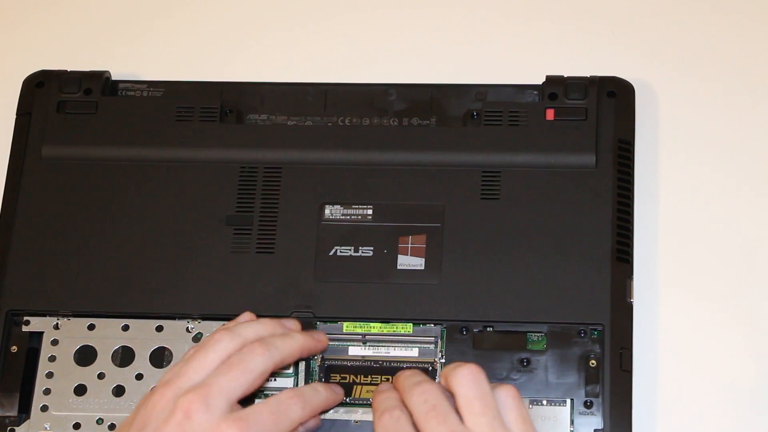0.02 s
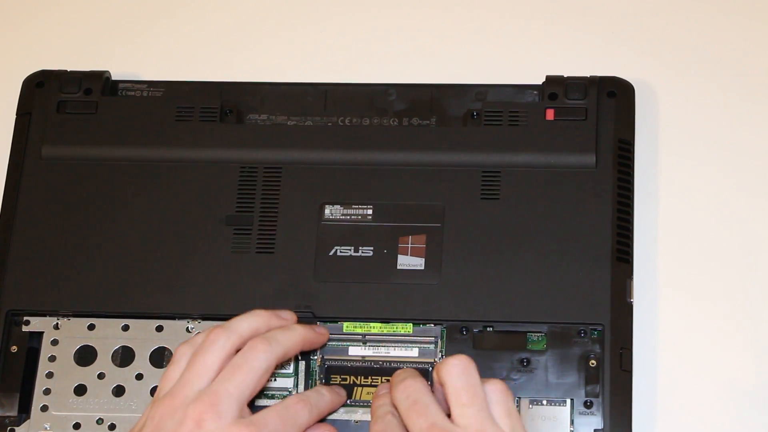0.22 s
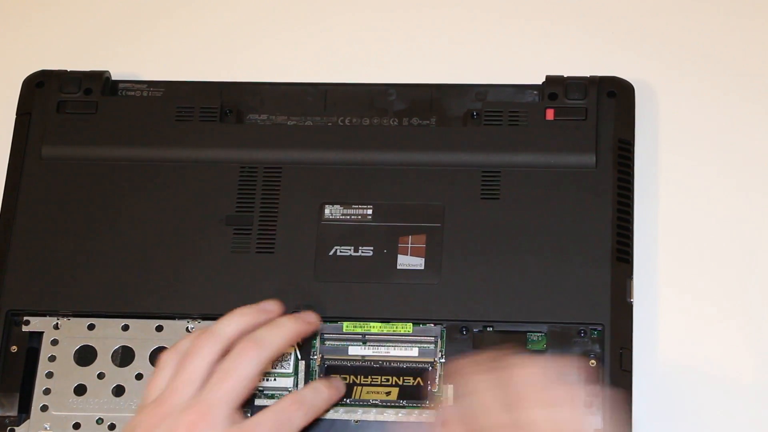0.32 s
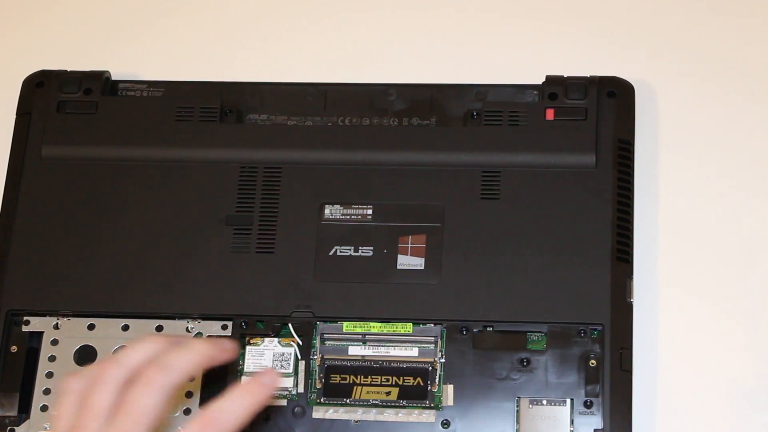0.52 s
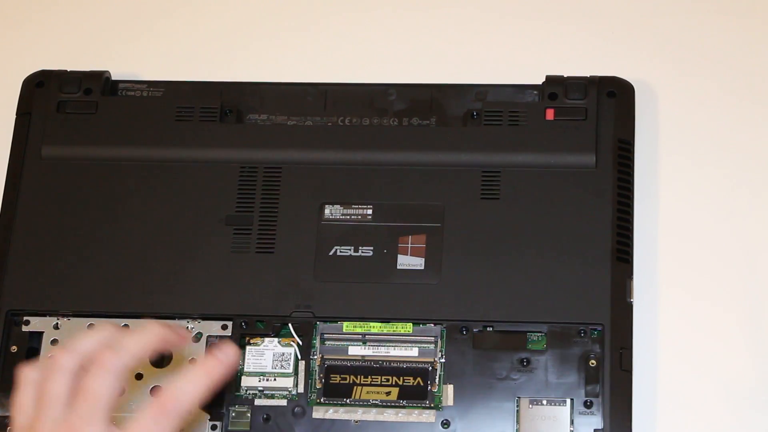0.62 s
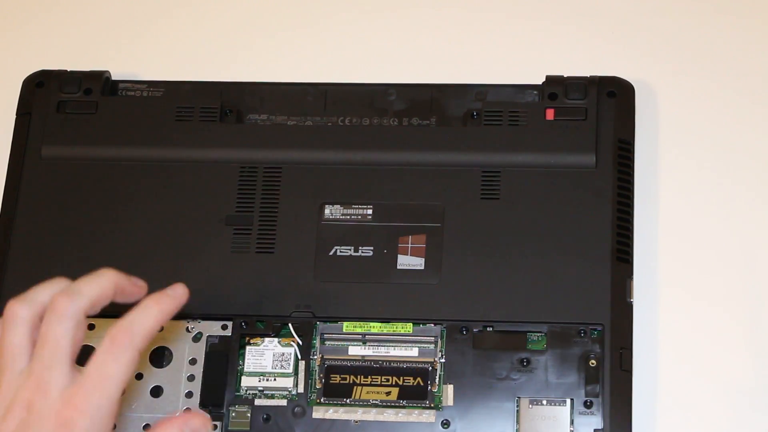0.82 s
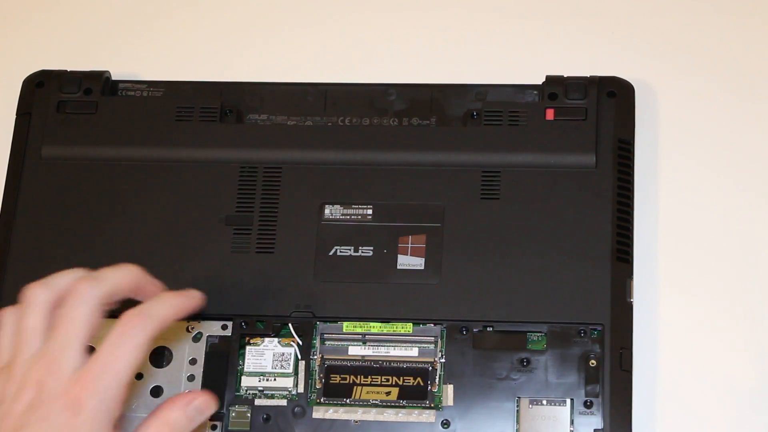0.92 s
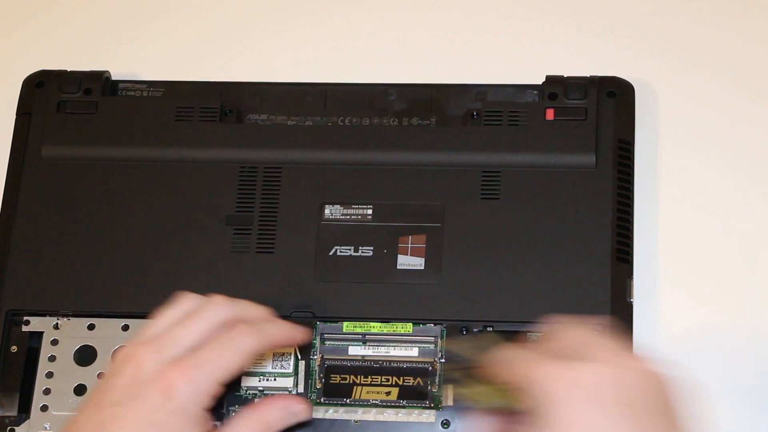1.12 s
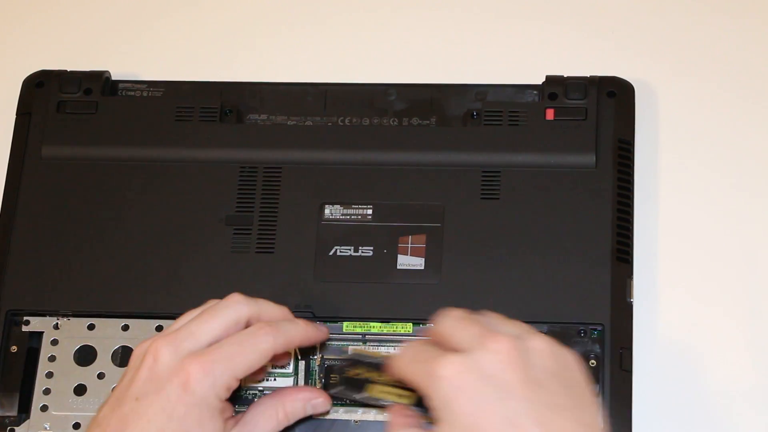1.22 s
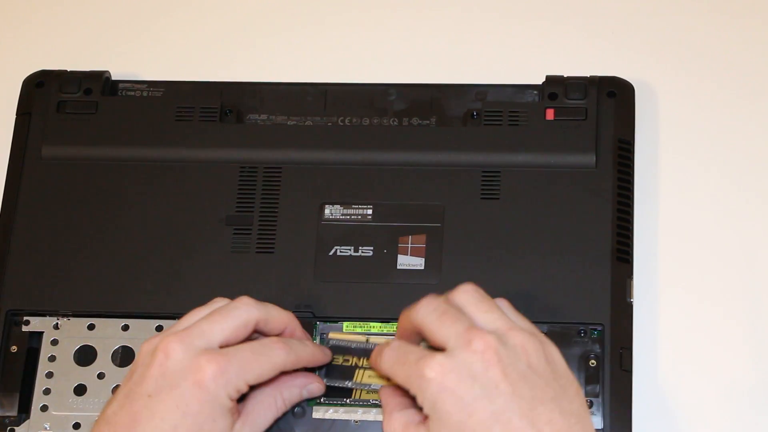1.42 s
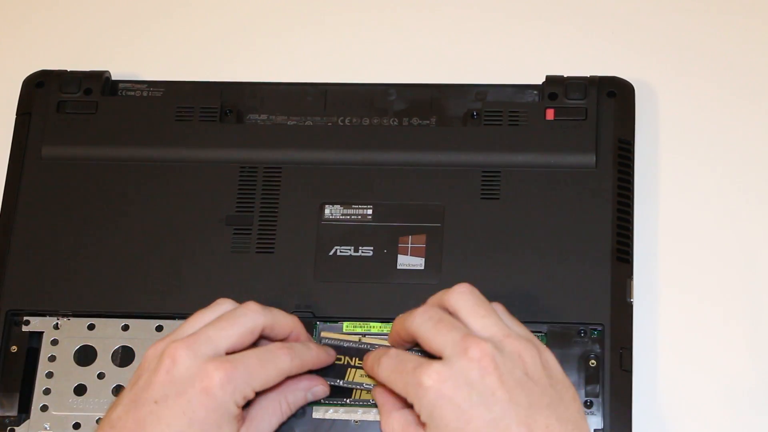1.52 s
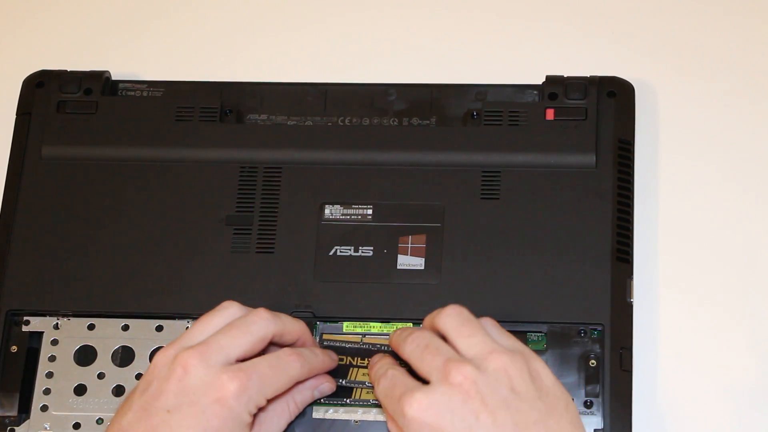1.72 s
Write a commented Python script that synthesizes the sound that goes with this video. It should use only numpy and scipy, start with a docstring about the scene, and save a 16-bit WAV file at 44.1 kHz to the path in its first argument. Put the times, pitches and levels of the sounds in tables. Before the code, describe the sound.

A sharp plastic latch snap as a circuit board clicks into its slot, then soft fumbling

```python
"""A latch springs home in one clipped burst of ticks as fingers press a small circuit board into its slot
in an upturned plastic case on a desk, close to a mono microphone. Sharp contacts ring damped modes of the case.
Fingers and board tap and rub as gritty pushes and friction grains, with a brief thin whistle of narrow noise.
Knocks make the desk boom softly, a small bare room answers with noise echoes, and hiss and rumble lie below."""
import sys
import numpy as np
from scipy import signal
from scipy.fft import rfft, irfft
from scipy.io import wavfile
from scipy.ndimage import uniform_filter1d

SR = 44100
rng = np.random.default_rng(int(sys.argv[2]) if len(sys.argv) > 2 else 0)


def invert_db(level):
    """Linear amplitude ratio for a level in decibels (20 dB per decade), elementwise."""
    return 10 ** (np.asarray(level, dtype=float) / 20)


def generate_wav(signal):
    """Clip the signal to [-1, 1] and save it as 16-bit WAV at the path in sys.argv[1]."""
    frames = np.transpose(np.atleast_2d(signal))
    scaled = np.clip(frames, -1, 1) * 32767
    pcm = np.round(scaled).astype(np.int16)
    wavfile.write(sys.argv[1], SR, pcm)


N = 79380
T = np.arange(N) / SR
BLOW_SAMPLES = 3000  # room for one contact and its ring


def ring(push, hz, t60_s, sharp=False):
    """One damped mode; a unit pulse rings it at height 1, starting from rest or, if sharp, from its crest."""
    radius = np.exp(-np.log(1000) / (t60_s * SR))
    angle = 2 * np.pi * hz / SR
    start = [1, -radius * np.cos(angle)] if sharp else [0, radius * np.sin(angle)]
    return signal.lfilter(start, [1, -2 * radius * np.cos(angle), radius ** 2], push)


def near(hz, centre_hz, octaves):
    """Weight of a mode by its distance in octaves from the centre of a blow."""
    return np.exp(-0.5 * (np.log2(hz / centre_hz) / octaves) ** 2)


def level(x, db):
    """Sets the rms level."""
    return x * invert_db(db) / np.sqrt(np.mean(x ** 2))


# Ringing modes of the plastic case:
# pitch_hz [Hz], level_db [dB, relative], t60_s [s, before damping]
CASE_MODES = [(480, -3.5, 0.013), (900, 4, 0.02), (1319, -0.5, 0.026), (1540, -1, 0.058), (1958, 4, 0.016),
              (2131, -3.5, 0.075), (2528, 4, 0.016), (3265, 3, 0.015), (3692, -1.5, .04),
              (4250, -4.5, 0.021), (5020, -8.5, 0.032), (6007, -7, 0.0072), (8400, -4, 0.0087),
              (10920, 6, 0.0038)]
# Ringing modes of the loose board:
# pitch_hz [Hz], level_db [dB, relative], t60_s [s, before damping]
BOARD_MODES = [(1350, -5.5, 0.033), (1818, -4, 0.041), (2160, -3, 0.041), (3050, -14, 0.013),
               (3425, 0.5, .03), (3700, -1.5, 0.05), (4110, -4, 0.009), (6240, -11, .015)]
BOARD_FROM_S = 1.3  # from here on the hands play the loose board, not the case
BOARD_RING_DB = 4.5  # the board rings this much more, against its crack or scrape, than the case


def body(push, centre_hz, octaves, damp=1, modes=CASE_MODES):
    """The modes of case or board rung by a push, strongest near its centre; damp scales their ring times."""
    out = 0
    for k, (hz, db, t60_s) in enumerate(modes):
        mode = ring(push * near(hz, centre_hz, octaves), hz, t60_s * damp)
        out = out + (-1) ** k * invert_db(db) * mode
    return out


def broad(push, centre_hz, octaves):
    """Noise-like colour: overlapping wide resonances a third of an octave apart, strongest near the centre."""
    out = 0
    for k, hz in enumerate(200 * 2 ** np.arange(0, 6.4, 1 / 3)):
        band = ring(push * near(hz, centre_hz, octaves), hz, 7 / hz, sharp=True)
        out = out + (-1) ** k * band * np.sqrt(hz / 3000)
    return out


def contact(decay_s, grit):
    """A sharp first touch and a gritty trail dying away."""
    push = grit * rng.standard_normal(BLOW_SAMPLES) * np.exp(-T[:BLOW_SAMPLES] / decay_s)
    push[0] = 1
    return push


def blow(push, centre_hz, octaves, crack_db, damp, modes=CASE_MODES):
    """Ring of case or board plus a broad crack, crack_db against the ring; peak 1."""
    ringing = level(body(push, centre_hz, octaves, damp, modes), 0)
    crack = level(broad(push, centre_hz, octaves), crack_db)
    both = ringing + crack
    return both / np.abs(both).max()


# The latch springing home, contact after contact:
# start_s [s], level_db [dB peak], centre_hz [Hz], spread_octaves [octaves]
LATCH_CONTACTS = [(.2009, -14, 2500, 1), (0.2024, 1.5, 4150, 1), (.2025, -3.5, 2567, 0.5),
                  (.2033, -0.5, 2600, 0.35), (.2047, 2, 10200, 0.92), (0.2046, -1.5, 2600, 0.36),
                  (.2057, -5.5, 2300, 0.9), (0.2058, -3.5, 1850, 1)]
# The latch as the walls receive it, one blended crack:
# level_db [dB peak], centre_hz [Hz], spread_octaves [octaves]
LATCH_AT_WALLS = (6.06, 2770, 1.316)
# The metal spring clip ringing on thinly: pitch_hz [Hz], level_db [dB], t60_s [s]
CLIP_RING_MODE = (4302, -33, .33)


def latch():
    """A run of sharp contacts within a few milliseconds, the spring clip ringing after; close and far sound."""
    clip_hz, clip_db, clip_t60_s = CLIP_RING_MODE
    kick = np.zeros(N)
    kick[int(LATCH_CONTACTS[-1][0] * SR)] = invert_db(clip_db)
    close = ring(kick, clip_hz, clip_t60_s)
    for start_s, db, centre_hz, octaves in LATCH_CONTACTS:
        i = int(start_s * SR)
        push = contact(decay_s=0.0007, grit=0.13)
        # damp: share of ring time left under the finger
        tick = blow(push, centre_hz, octaves, crack_db=-2, damp=0.49)
        close[i:i + BLOW_SAMPLES] += invert_db(db) * tick

    far = np.zeros(N)
    far_db, far_hz, far_octaves = LATCH_AT_WALLS
    i = int(LATCH_CONTACTS[3][0] * SR)
    push = contact(decay_s=0.0005, grit=0)
    far[i:i + BLOW_SAMPLES] = invert_db(far_db) * blow(push, far_hz, far_octaves, crack_db=1.2, damp=0.39)
    return close, far


# Taps of board and fingernails:
# start_s [s], level_db [dB peak], centre_hz [Hz], grit_decay_s [s], spread_octaves [octaves]
TAP_CONTACTS = [(.007, -43.5, 3500, 0.0026, 0.23), (.056, -28, 1896, 0.0039, 1.3),
                (0.694, -29, 4570, 0.0047, 0.77), (.728, -39.5, 1043, 0.0026, 0.27),
                (0.749, -35.5, 1060, 0.0017, 0.24), (.798, -28, 3000, .001, 0.59),
                (0.8127, -29.5, 2570, 0.00062, .8), (0.8168, -28, 3700, 0.00033, 0.6),
                (1.071, -24.5, 1580, 0.00021, 1.27), (1.367, -42, 2592, 0.0033, 0.34),
                (1.411, -30.5, 2240, 0.002, 1.18), (1.444, -24.5, 2490, 0.0033, 0.66),
                (1.462, -32, 1895, 0.0036, 0.13), (1.493, -43.5, 6500, 0.0064, 0.545),
                (1.664, -44, 1750, .004, 0.76), (1.687, -33.5, 2500, 0.0023, 1.1),
                (1.702, -21.5, 3660, .0012, .4), (1.724, -33, 1780, 0.00081, 0.61)]


def taps():
    """Each tap is a rough short contact on the case or, later, the loose board."""
    out = np.zeros(N)
    for start_s, db, centre_hz, decay_s, octaves in TAP_CONTACTS:
        i = int(start_s * SR)
        crack_db, modes = 3.5, CASE_MODES
        if start_s > BOARD_FROM_S:
            crack_db, modes = crack_db - BOARD_RING_DB, BOARD_MODES
        push = contact(decay_s, grit=0.15)
        out[i:i + BLOW_SAMPLES] += invert_db(db) * blow(push, centre_hz, octaves, crack_db, 0.57, modes)
    return out


def friction(table):
    """Dense noise grains of uneven strength following a table; gives grains, centre and spread over time."""
    start_s, db, centre_hz, octaves = np.array(table).T
    noise = rng.standard_normal(N)
    steps = np.repeat(rng.standard_normal(N // 64 + 1), 64)
    unevenness = uniform_filter1d(steps, 48)[:N]
    grains = noise * invert_db(2.5 * unevenness)
    grains *= invert_db(np.interp(T, start_s, db)) / 8
    return grains, np.interp(T, start_s, centre_hz), np.interp(T, start_s, octaves)


# Fingers and board sliding, glided from point to point:
# start_s [s], level_db [dB, relative], centre_hz [Hz], spread_octaves [octaves]
RUB_STROKES = [(0, -44.5, 1900, 1.2), (.1, -52, 2500, 1.34), (.19, -50.5, 3060, 1), (.25, -66, 2936, 1.2),
               (0.681, -81, 3276, 0.82), (0.698, -43, 4010, 0.69), (0.746, -30.5, 4430, 1.2),
               (0.786, -42, 3700, 0.91), (0.861, -39, 3700, .7), (0.889, -39.5, 3400, 0.77),
               (.915, -27.5, 3795, 1), (.95, -44.5, 3600, 0.82), (1.001, -67, 3224, 0.34),
               (1.07, -70, 4020, 1.2), (1.08, -49.5, 4530, 1.7), (1.125, -58, 3090, 1.4),
               (1.17, -58, 1222, 0.38), (1.302, -55, 1300, 0.58), (1.37, -51.5, 1706, 0.77),
               (1.408, -47, 2490, 0.88), (1.478, -42, 2050, 0.77), (1.55, -58, 1800, .7),
               (1.629, -70.5, 1485, 0.88), (1.679, -46, 2500, 0.77), (1.73, -54, 3870, .35),
               (1.8, -54, 4000, 0.55)]


def rub():
    """Friction grains scrape broadly and also ring the case a little, then the board."""
    ring_db = -9
    grains, centre_hz, octaves = friction(RUB_STROKES)
    out = broad(grains, centre_hz, octaves)
    i = int(BOARD_FROM_S * SR)
    out[:i] += invert_db(ring_db) / 2 * body(grains[:i], centre_hz[:i], octaves[:i])
    board = body(grains[i:], centre_hz[i:], octaves[i:], 0.68, BOARD_MODES)
    out[i:] += invert_db(ring_db + BOARD_RING_DB) / 2 * board
    return out


# Palms and sleeves dragging on case and desk, glided from point to point:
# start_s [s], level_db [dB, relative], centre_hz [Hz], spread_octaves [octaves]
DRAG_STROKES = [(0, -65, 500, 0.71), (.3, -86.5, 500, .8), (.7, -70, 687, 0.69), (.735, -37.5, 900, 0.46),
                (.82, -36, 900, 0.38), (.93, -44.5, 1250, 0.48), (1.0, -75, 506, .8), (1.15, -55, 348, .6),
                (1.3, -44.5, 332, 0.58), (1.47, -41.5, 607, 1.345), (1.6, -52.5, 337, 1),
                (1.7, -41.5, 691, 0.97), (1.8, -55, 496, .8)]


def drag():
    """Soft friction grains heard as a broad scrape alone, with no body ringing."""
    return broad(*friction(DRAG_STROKES))


# A brief thin whistle:
# start_s [s], length_s [s], pitch_hz [Hz], level_db [dB rms before the swell]
WHISTLE_TONE = (.122, 0.22, 7303.5, -52.5)


def whistle():
    """Noise through one narrow resonance, swelling and fading over a half sine."""
    start_s, length_s, hz, db = WHISTLE_TONE
    tone = level(ring(rng.standard_normal(N), hz, 0.014), db)
    return tone * np.sin(np.pi * np.clip((T - start_s) / length_s, 0, 1))


# Echo bands of the room: centre_hz [Hz], level_db [dB, relative], t60_s [s]
ROOM_BANDS = [(387, -11.5, 0.55), (837.4, -17.5, 0.49), (1400, -17.5, .55), (2500, -21, 0.47),
              (4460, -18, 0.41), (7500, -24, 0.44), (10960, -23.5, 0.083), (14800, -18, .26)]


def room(x):
    """Dense noise echoes that build up quickly and die away band by band."""
    delay_s, rise_s = 0.002, 0.026
    t = T[:SR]
    echo = 0
    for hz, db, t60_s in ROOM_BANDS:
        bandpass = signal.butter(2, [hz / 1.35, hz * 1.35], "band", fs=SR, output="sos")
        band = signal.sosfilt(bandpass, rng.standard_normal(SR))
        # evens out the energy of short and long decays
        balance = np.sqrt(2 * np.log(1000) / t60_s / SR * 20)
        echo = echo + invert_db(db - 60 * t / t60_s) * band * balance
    echo *= np.clip((t - delay_s) / rise_s, 0, 1)
    return signal.fftconvolve(x, echo)[:N]


# Modes of the desk top: pitch_hz [Hz], level_db [dB, relative], t60_s [s]
DESK_MODES = [(60, 0.5, 0.35), (84.5, -2, 0.51), (124, 1, 0.24), (164, -5.5, .2), (208, -6, .2),
              (370, -2, 0.11)]
# Knocks and leans that shake the desk:
# start_s [s], level_db [dB, relative], push_decay_s [s], centre_hz [Hz]
DESK_KNOCKS = [(0, -41, 0.012, 121), (0.204, -24.5, 0.012, 122), (0.249, -23, 0.01, 81),
               (0.308, -26.5, 0.093, 124), (.694, -33, 0.0022, 64.2), (.72, -36, 0.027, 370),
               (.73, -29, 0.068, 160), (1.42, -45.5, .08, 74.5), (1.699, -41.5, .02, 79.5)]


def desk():
    """Knocks and leans shake the desk modes with random pushes that die away."""
    shake = np.sign(rng.standard_normal(N))
    pushes = []
    for start_s, db, decay_s, centre_hz in DESK_KNOCKS:
        fade = (T >= start_s) * np.exp(-np.abs(T - start_s) / decay_s)
        # longer pushes are spread thinner
        pushes.append((invert_db(db) * fade / np.sqrt(decay_s * SR), centre_hz))
    out = 0
    for hz, db, t60_s in DESK_MODES:
        push = sum(fade * near(hz, centre_hz, 0.35) for fade, centre_hz in pushes)
        out = out + invert_db(db) * ring(shake * push, hz, t60_s)
    return out


# Spectrum of the steady rumble and hiss: pitch_hz [Hz], level_db [dB per Hz, relative]
AIR_SPECTRUM = [(12, -10), (20, -17), (44, -12.5), (133, -11), (226, -19), (316, -22), (417, -28),
                (466, -26.5), (814, -41), (3020, -39), (15600, -46)]


def air():
    """Steady noise shaped in frequency, heaviest in the low rumble."""
    hz, db = np.array(AIR_SPECTRUM).T
    bins_hz = np.maximum(np.arange(N // 2 + 1) * SR / N, 1)
    gain = invert_db(np.interp(np.log(bins_hz), np.log(hz), db))
    return level(irfft(rfft(rng.standard_normal(N)) * gain, N), -50.5)


def scene():
    """Close sounds, their room, desk and air, the same left and right."""
    close, far = latch()
    hands = taps() + rub() + drag() + whistle()
    mono = close + hands + room(far + hands) + desk() + air()
    return np.array([mono, mono])


def low_pass(x):
    """Removes everything above the highest recorded frequency."""
    return signal.sosfilt(signal.butter(12, 15770, fs=SR, output="sos"), x)


def record(dry):
    """Each input channel adds its own amplifier hiss, then clips on the loudest peaks."""
    hiss = invert_db(-65.5) * rng.standard_normal(dry.shape)
    mix = np.clip(dry + hiss, -1, 1)
    return low_pass(mix)


dry = scene()
out = record(dry)
generate_wav(out)
```